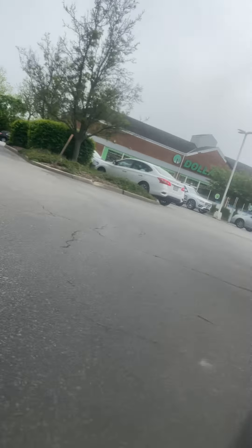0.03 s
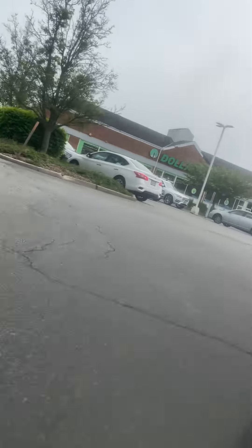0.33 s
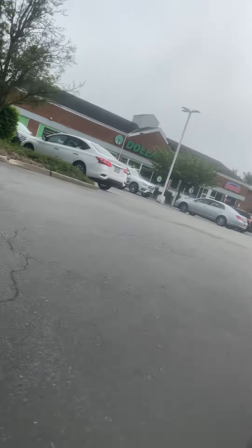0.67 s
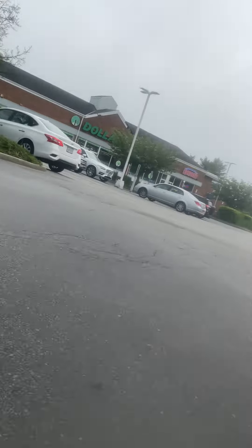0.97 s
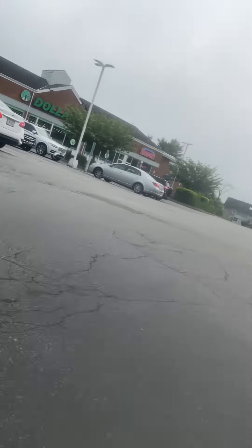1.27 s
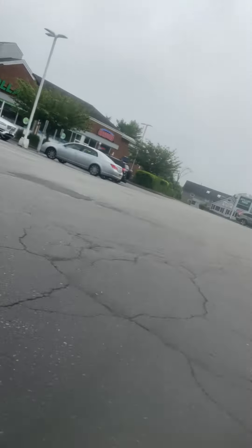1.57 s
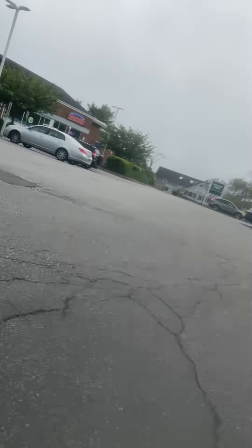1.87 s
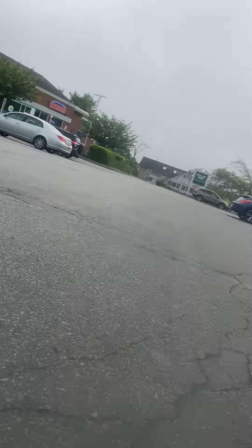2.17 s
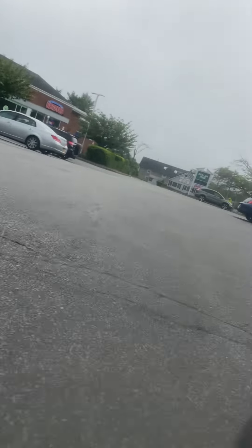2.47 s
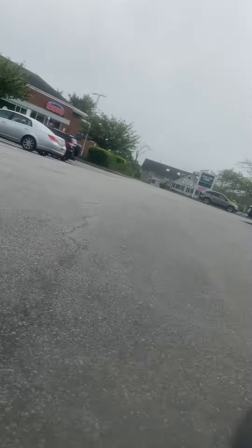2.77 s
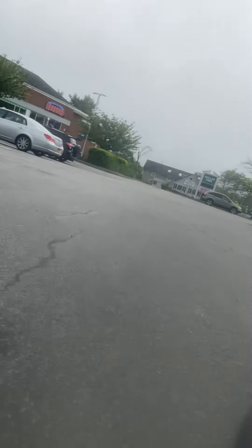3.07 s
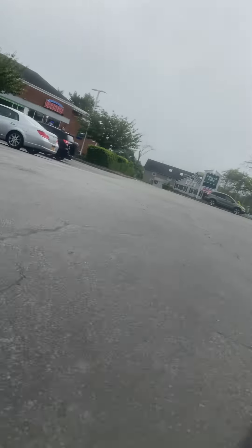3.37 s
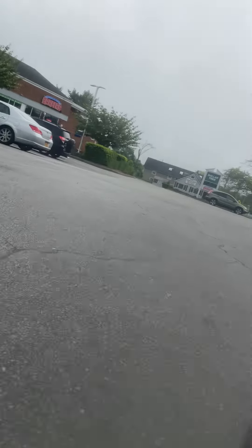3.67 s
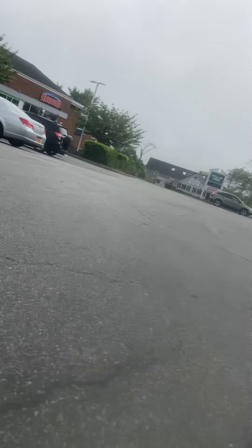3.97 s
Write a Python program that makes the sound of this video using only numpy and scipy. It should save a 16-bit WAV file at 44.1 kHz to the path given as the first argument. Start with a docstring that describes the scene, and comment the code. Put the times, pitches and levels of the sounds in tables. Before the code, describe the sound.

A powered wheelchair rumbles deeply across a car park, heard from on board. Its wheels judder and thump over cracked asphalt while loose parts clack and jingle. In the second half, a distant bird whistles faintly.

```python
"""A car park: a powered wheelchair rolls over cracked asphalt, heard from on board.
The frame lays down a booming rumble, the wheels judder, and the tyres hiss and snap over grit.
Small metal fittings jingle throughout. A mount clunks now and then, jolts knock two loose parts,
and cracks thump the frame. A bird whistles far off; a limiter holds the rumble down."""
import sys
import numpy as np
from scipy import signal
from scipy.fft import rfft, irfft
from scipy.io import wavfile
from scipy.ndimage import uniform_filter1d, minimum_filter1d

SR = 44100
rng = np.random.default_rng(int(sys.argv[2]) if len(sys.argv) > 2 else 0)


def store_wav(level_fs):
    """Save 16-bit WAV to argv[1]."""
    pcm = np.round(np.clip(np.atleast_2d(level_fs), -1, 1) * 32767)
    wavfile.write(sys.argv[1], SR, pcm.T.astype(np.int16))


N = 176400

# low bed of the frame: (frequency [Hz], level [dB])
RUMBLE_EQ = [(26, -20.5), (47, -5), (70, -1.5), (100, -0.5), (125, -7.5), (170, -16.5), (260, -32),
             (900, -84)]
# brief dips in the rumble: (time [s])
RUMBLE_DIPS = [.375, 1.126, 1.515, 1.595, 2.369, 2.735, 3.251, 3.578]
# roughness of the asphalt, riding the judder and shake: (time [s], level [dB])
ROUGHNESS = [(0, -21.5), (.25, -22), (.77, -27.5), (.92, -19), (1.03, -21.5), (1.35, -24.5), (1.56, -22),
             (1.8, -28), (1.95, -22), (2.17, -18), (2.36, -22), (2.8, -26), (3.0, -23), (3.13, -22),
             (3.24, -26), (3.45, -24), (4, -25.5)]
# body of the wheel judder: (frequency [Hz], level [dB])
JUDDER_EQ = [(70, -13), (140, -12), (200, 1), (285, -1), (365, -10.5), (450, -14.5), (540, -26.5),
             (800, -41), (1400, -32.5), (2500, -67.5)]
# midrange of the mount shaking sideways: (frequency [Hz], level [dB])
SHAKE_EQ = [(45, -15.5), (160, 10.5), (370, -3), (460, 3.5), (740, -2), (1020, -2.5), (1320, -7),
            (1520, -19.5), (1720, -11.5), (2050, -21), (3200, -53.5)]
# bright tyre hiss: (frequency [Hz], level [dB])
HISS_EQ = [(900, -9.5), (2100, -4), (3000, 2.5), (3500, 1), (3950, 6.5), (4300, -8), (5200, 3), (5600, -6),
           (6600, -23), (10000, -15.5), (11300, -39.5)]
# its stereo image: (frequency [Hz], likeness [0-1], phase [rad], left over right [dB])
HISS_STEREO = [(2030, 0.01, 1.6, -1), (3300, 0.5, 0.39, 0), (5700, .5, 3.17, -5), (6100, 0.7, 0.99, -2.5),
               (10100, 0.4, 3, 0.5)]
# tread scrapes: (time [s], half-length [s], level [dB])
SCRAPE_CUES = [(.08, 0.16, -43), (0.72, 0.082, -37.5), (1.036, 0.048, -36.5), (3.204, 0.05, -39),
               (3.745, 0.032, -38)]
# colour of a scrape: (frequency [Hz], level [dB])
SCRAPE_EQ = [(2200, -13.5), (3550, -9), (3900, 4), (4200, -2), (5200, -2), (6400, -29), (11000, -34.5)]
# one ping for each metal fitting: (frequency [Hz], level [dB])
JINGLE_TONES = [(3480, 2), (3900, -4), (4470, 0), (4700, 2.5), (5060, 1.5), (5440, 1)]
# jolts to the loose parts: (time [s], clack level [dB], clink level [dB])
JOLT_CUES = [(0.2049, -25, -37), (0.33, -22.5, -67), (0.416, -28.5, -42), (0.561, -19.5, -38),
             (0.836, -21.5, -46), (0.891, -26, -48), (0.923, -32, -39), (0.968, -30.5, -41),
             (1.0492, -28.5, -38), (1.117, -23.5, -48.5), (1.133, -25, -51), (1.477, -15, -37),
             (1.573, -25, -38), (1.604, -30, -42), (1.73, -35, -31.5), (1.918, -23, -48),
             (1.9883, -27, -46), (2.02, -29, -46), (2.13, -44, -33), (2.179, -37, -34.5), (2.213, -42, -38),
             (2.3304, -40, -28.5), (2.3874, -29.5, -37.5), (2.481, -27.5, -40), (2.6815, -27, -38),
             (2.699, -25, -50), (2.728, -21.5, -54), (2.972, -40, -31.5), (3.04, -37.5, -32),
             (3.122, -25, -58.5), (3.202, -25.5, -36.5), (3.294, -45, -35), (3.4027, -24.5, -49),
             (3.441, -23.5, -55), (3.485, -24.5, -49), (3.599, -22, -25.5), (3.649, -27.5, -36),
             (3.8067, -25.5, -57), (3.977, -28, -51)]
# ring of the duller part: (frequency [Hz], level [dB], t60 [s], stereo phase [rad])
CLACK_MODES = [(477, -12, 0.033, 6.6), (1188, -2.5, 0.042, 3.1), (1298, 0, 0.043, 2.4)]
# ring of the brighter part: (frequency [Hz], level [dB], t60 [s], stereo phase [rad])
CLINK_MODES = [(854, 6, .045, 2.9), (1716, 3.5, 0.039, 1.96), (5030, -16.5, 0.028, 2.8)]
# occasional clunks of the mount: (time [s], level [dB])
CLUNK_CUES = [(.1, -12), (.205, -12.5), (1.05, -15), (1.479, -30), (1.595, -19.5), (2.047, -18),
              (2.423, -10), (2.482, -22)]
# ring of the mount: (frequency [Hz], level [dB], t60 [s], stereo phase [rad])
MOUNT_MODES = [(564, -10.5, 0.092, 2.7), (894, -5.5, 0.056, 2.83)]
# wheels dropping into cracks: (time [s], level [dB])
CRACK_CUES = [(.828, -6.5), (.889, -4.5), (0.922, -4.5), (0.967, -9.5), (1.212, -15.5), (1.582, -5.5),
              (1.601, -3.5), (2.119, -3), (2.165, -10.5), (2.422, -5.5), (2.971, -10), (3.208, -8.5),
              (3.28, -11), (3.358, -8), (3.678, -13)]
# low ring of the frame: (frequency [Hz], level [dB], t60 [s], stereo phase [rad])
FRAME_MODES = [(151, 3, 0.11, 0.096), (220.6, 2.5, 0.059, -.2), (296.4, -4, 0.1, -0.21),
               (420, -11.5, 0.056, 0.82)]
# grit snapping under a tyre: (time [s], level [dB])
GRIT_CUES = [(1.961, -39), (2.099, -30), (2.561, -30.5), (2.572, -39), (2.724, -39), (3.479, -35)]
# colour of a snap: (frequency [Hz], level [dB])
GRIT_EQ = [(5400, 8), (6400, -19), (11000, -24)]
# bird whistles: (time [s], length [s], pitch [Hz], level [dB])
BIRD_NOTES = [(2.362, .057, 3720, -44), (2.683, 0.12, 3770, -33.5), (2.942, 0.14, 3760, -35.5),
              (3.142, 0.11, 3675, -34), (3.318, 0.1, 3694, -32.5), (3.953, 0.061, 6460, -49)]

BOOM_HZ, BOOM_DRIFT_HZ, DIP_DB, DIP_S = 92.6, 10.7, -12.5, 0.0087
ATTACK_S, PREROLL_S = 0.0019, 0.02
SCUFF_S, BOUNCE_S, BOUNCE_DB = 0.0042, 0.0087, -13
CEILING, CUTOFF_HZ = 0.91, 11600
TIME, FREQS = np.arange(N) / SR, np.fft.rfftfreq(N, 1 / SR)


def amp(db):
    return 10 ** (np.asarray(db) / 20)


def unit(x):
    return x / np.sqrt(np.mean(x ** 2) + 1e-20)


def over_hz(points, column=1):
    table = np.transpose(points)
    return np.interp(np.log(FREQS + 1), np.log(table[0]), table[column])


def add(mix, s, sound):
    part = mix[:, max(round(s * SR), 0):][:, :sound.shape[1]]
    part += sound[:, :part.shape[1]]


def white_spectrum():
    return rfft(rng.standard_normal(N))


def wander(rate_hz):
    """Smooth random modulation of rms 1."""
    return unit(irfft(white_spectrum() / np.sqrt(1 + (FREQS / rate_hz) ** 6), N))


def stereo_noise(eq, likeness, phase, balance_db):
    """Coloured noise of rms 1; likeness and phase set its width."""
    left = white_spectrum()
    right = likeness * left + np.sqrt(1 - likeness ** 2) * white_spectrum()
    right *= np.exp(-1j * phase) / amp(balance_db)
    return unit(irfft(np.array([left, right]) * amp(over_hz(eq)), N))


def crackle(per_s, decay_s, bed):
    """Envelope of rms 1: random spikes dying away over an even bed."""
    spikes = (rng.random(N) < per_s / SR) * rng.random(N)
    tails = signal.lfilter([1], [1, -np.exp(-1 / (decay_s * SR))], spikes)
    return unit(bed + unit(tails))


def patchy(hiss, depth_db=3.5):
    """Roughens a hiss with random patches in time and pitch."""
    bands = signal.stft(hiss, nperseg=512)[2]
    patches = uniform_filter1d(rng.standard_normal(bands.shape[1:]), size=4, axis=0)
    patches = unit(uniform_filter1d(patches, size=4, axis=1))
    return unit(signal.istft(bands * amp(depth_db * patches), nperseg=512)[1][:, :N])


def ring(modes, detune=0.013):
    """Dying modes of a struck part, tuned a little differently on each hit."""
    t = np.arange(SR // 8) / SR
    out = np.zeros((2, len(t)))
    for hz, db, t60, phase in modes:
        pitch = hz * (1 + detune * rng.standard_normal())
        out += amp(db - 60 * t / t60) * np.sin(2 * np.pi * pitch * t - np.array([[0], [phase]]))
    return out * (1 - np.exp(-(t / ATTACK_S) ** 2))


def knock(modes):
    """A part scuffs, strikes PREROLL_S in and bounces once; normalised to peak 1."""
    t = np.arange(-PREROLL_S, PREROLL_S, 1 / SR)
    blow = 0.08 * rng.standard_normal(len(t)) * np.exp(-abs(t) / SCUFF_S)
    blow[len(t) // 2] += 1
    bounce_at = BOUNCE_S * (.5 + rng.random())
    blow[np.argmin(abs(t - bounce_at))] += amp(BOUNCE_DB)
    out = signal.fftconvolve(ring(modes), blow[None], axes=1)
    return out / abs(out).max()


def burst(s, decay_s):
    """Envelope with an instant attack at time s and a dying tail."""
    return (TIME > s) * np.exp(-abs(TIME - s) / decay_s)


def frame_rumble():
    """The low end: the frame's broad rumble and drifting boom, dipping briefly together."""
    phase = 2 * np.pi * np.cumsum(BOOM_HZ + BOOM_DRIFT_HZ * wander(12.06)) / SR
    boom = unit(amp(3.32 * wander(11)) * np.sin(phase + np.array([[0], [.33]])))
    bed = stereo_noise(RUMBLE_EQ, likeness=1.0, phase=-0.37, balance_db=0.1)
    dips = sum(np.exp(-((TIME - s) / DIP_S) ** 2) for s in RUMBLE_DIPS)
    return amp(DIP_DB * dips) * (amp(-11) * boom + amp(-6.5) * bed)


def wheel_judder(judder):
    """Bumps judder the wheels and shake the mount, louder where the asphalt is rough."""
    road_db = np.interp(TIME, *np.transpose(ROUGHNESS))
    bumps = amp(road_db - 0.5) * crackle(per_s=45, decay_s=0.019, bed=1.18)
    shake_db = -27 + 0.99 * (road_db - road_db.mean())
    shakes = amp(shake_db) * crackle(per_s=66, decay_s=0.012, bed=0.79)
    return bumps * judder + shakes * stereo_noise(SHAKE_EQ, 0.84, 2.62, 0.29)


def tyre_hiss():
    """The top end: tread crackles on the asphalt and swells into the odd scrape."""
    likeness, phase, balance_db = (over_hz(HISS_STEREO, column) for column in (1, 2, 3))
    hiss = patchy(stereo_noise(HISS_EQ, likeness, phase, balance_db))
    scrape = patchy(stereo_noise(SCRAPE_EQ, 0.82, 0.47, -1))
    swells = sum(amp(db) * np.exp(-((TIME - s) / half) ** 2) for s, half, db in SCRAPE_CUES)
    return crackle(per_s=47, decay_s=0.0062, bed=5.1) * (amp(-42) * hiss + swells * scrape)


def fittings_jingle(taps_per_s=64, t60=0.045):
    """A faint shimmer: random taps ring each small metal fitting."""
    out = np.zeros((2, N))
    image_hz, _, image_phase, _ = np.transpose(HISS_STEREO)
    for hz, db in JINGLE_TONES:
        taps = rng.random(N) < taps_per_s / SR
        accents = amp(np.minimum(rng.exponential(1, N), 3))
        ping = ring([(hz, db, t60, np.interp(hz, image_hz, image_phase))], detune=0.0048)
        out += signal.oaconvolve((taps * accents)[None], ping, axes=1)[:, :N]
    return amp(-45.5) * unit(out * amp([[-3], [0]]))  # leans right


def rattles():
    """The mount clunks now and then; jolts knock two loose parts over a tick of mount chatter."""
    hits, chatter = np.zeros((2, N)), np.zeros(N)
    for s, db in CLUNK_CUES:
        add(hits, s - PREROLL_S, amp(db) * knock(MOUNT_MODES))
    for s, clack_db, clink_db in JOLT_CUES:
        clack = amp(clack_db + 4) * knock(CLACK_MODES)
        clink = amp(clink_db + 13) * knock(CLINK_MODES)
        add(hits, s - PREROLL_S, clack + clink)
        chatter += (amp(clink_db + 4.5) + amp(clack_db - 6.5)) * burst(s, decay_s=0.0027)
    hits *= amp([[3.5], [1.5]])  # leans left
    return hits + amp(4) * chatter * stereo_noise(SHAKE_EQ, 1.0, 3.27, 0.87)


def crack_thumps(judder):
    """A wheel drops into a crack: the frame rings low, with a crunch of judder on top."""
    out = np.zeros((2, N))
    for s, db in CRACK_CUES:
        add(out, s, amp(db) * ring(FRAME_MODES, detune=0.055))
        out += amp(db - 18) * burst(s, decay_s=0.016) * judder
    return out


def grit_snaps():
    """Grit snaps under a tyre in tight, dry bursts of noise."""
    snaps = sum(amp(db) * burst(s, decay_s=0.0064) for s, db in GRIT_CUES)
    return snaps * stereo_noise(GRIT_EQ, 0.28, 2.04, -1)


def bird(sag=0.02):
    """Distant pure whistles, each wavering slightly and sagging in pitch."""
    out = np.zeros((2, N))
    for s, length, hz, db in BIRD_NOTES:
        progress = np.arange(0, length, 1 / SR) / length
        pitch = hz * (1 - sag * progress + 0.0036 * wander(80)[:len(progress)])
        phase = 2 * np.pi * np.cumsum(pitch) / SR
        add(out, s, amp(db) * np.sin(np.pi * progress) * np.sin(phase - np.array([[0], [.5]])))
    return out


def scene():
    """Rolling beds first, then the spot effects and the bird."""
    judder = stereo_noise(JUDDER_EQ, likeness=1.0, phase=0, balance_db=1.4)
    beds = frame_rumble() + wheel_judder(judder) + tyre_hiss() + fittings_jingle()
    return beds + rattles() + crack_thumps(judder) + grit_snaps() + bird()


def record(dry):
    """Master chain: a fast peak limiter, then a steep low-pass."""
    gain = np.minimum(1, CEILING / (abs(dry).max(0) + 1e-9))
    held = minimum_filter1d(gain, size=500)
    smoothed = uniform_filter1d(uniform_filter1d(held, size=250), size=250)
    lowpass = signal.firwin(401, CUTOFF_HZ, window=("kaiser", 9), fs=SR)
    return signal.oaconvolve(dry * smoothed, lowpass[None], "same")


dry = scene()
out = record(dry)
store_wav(out)
```